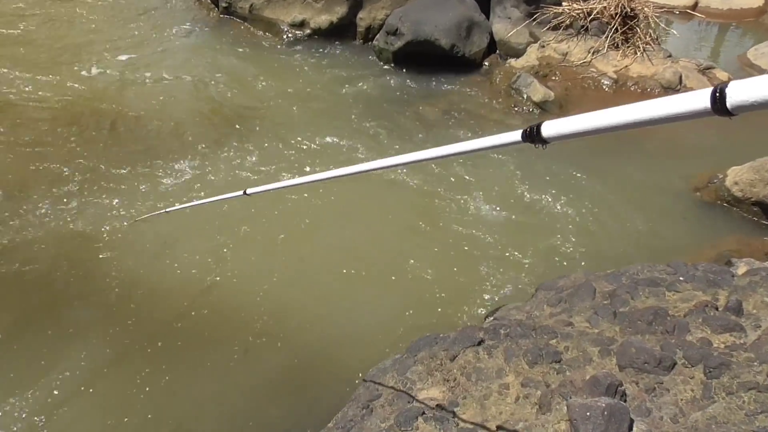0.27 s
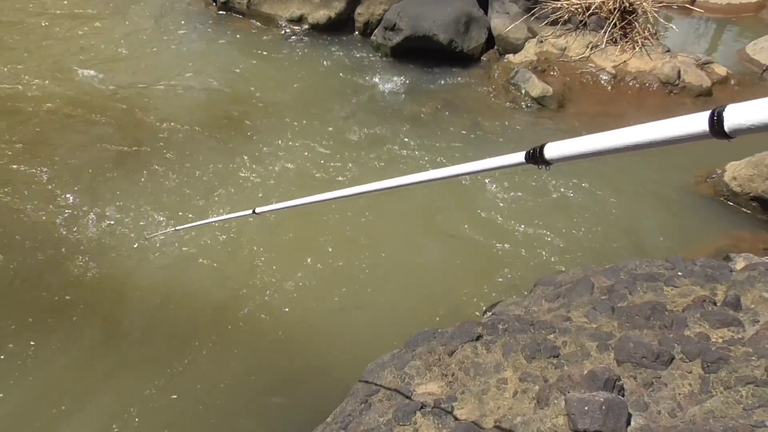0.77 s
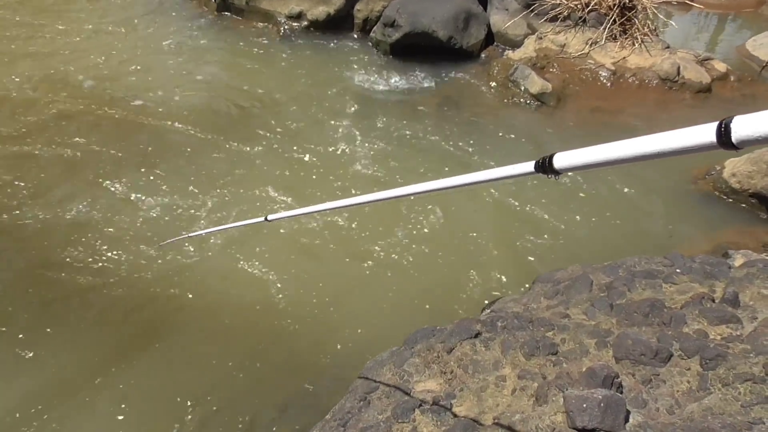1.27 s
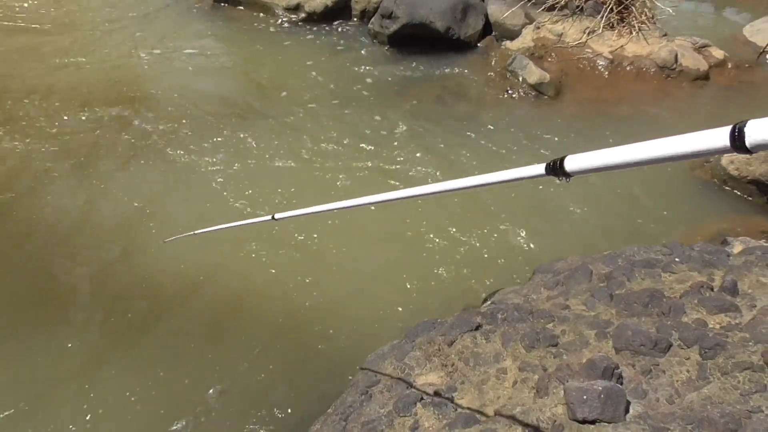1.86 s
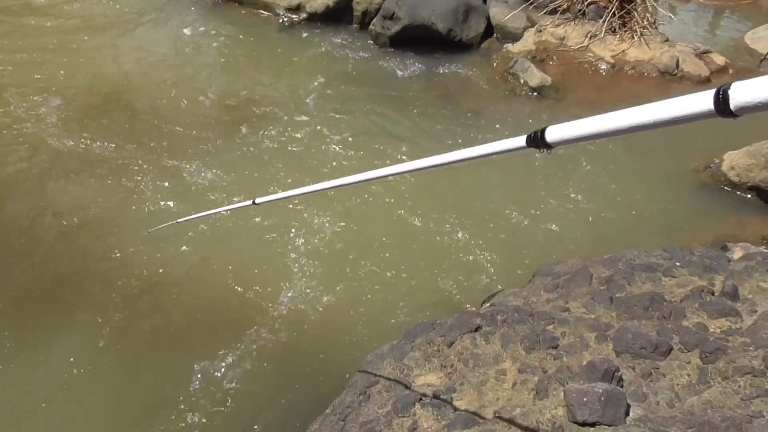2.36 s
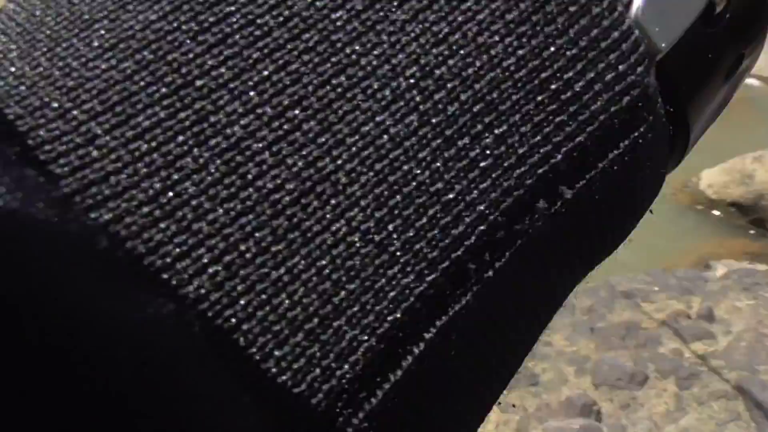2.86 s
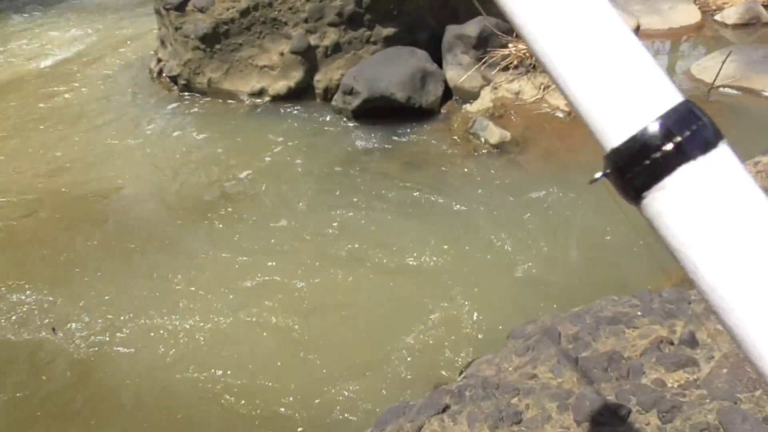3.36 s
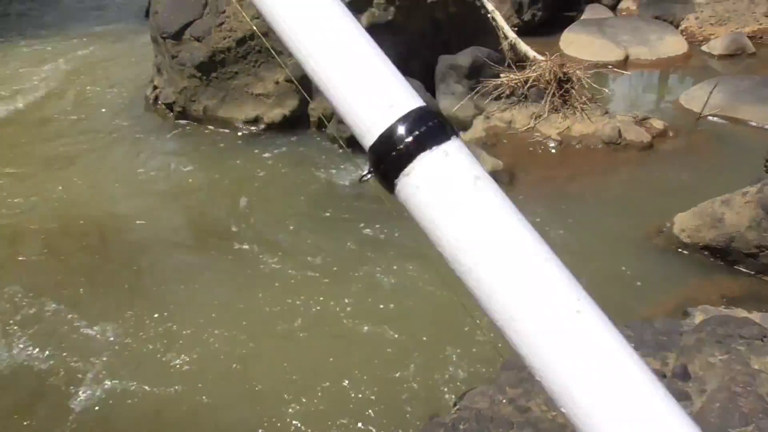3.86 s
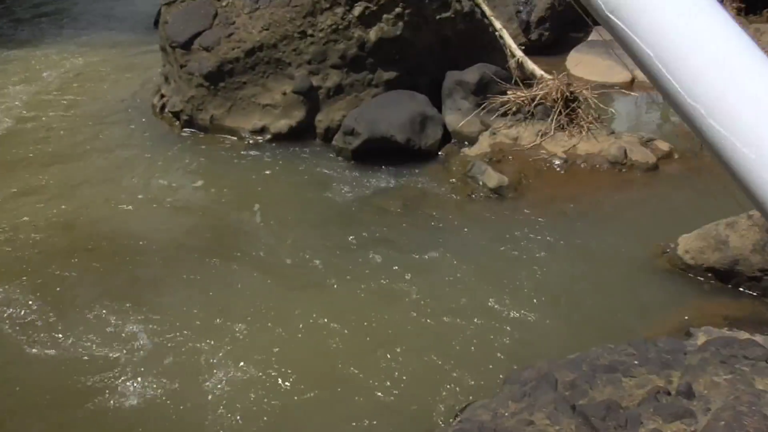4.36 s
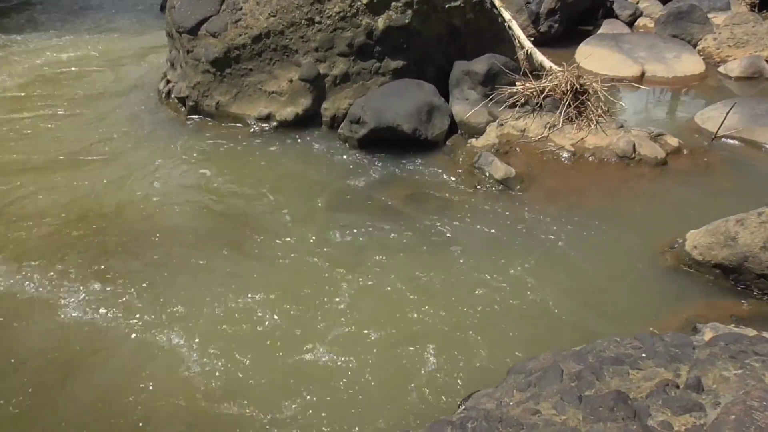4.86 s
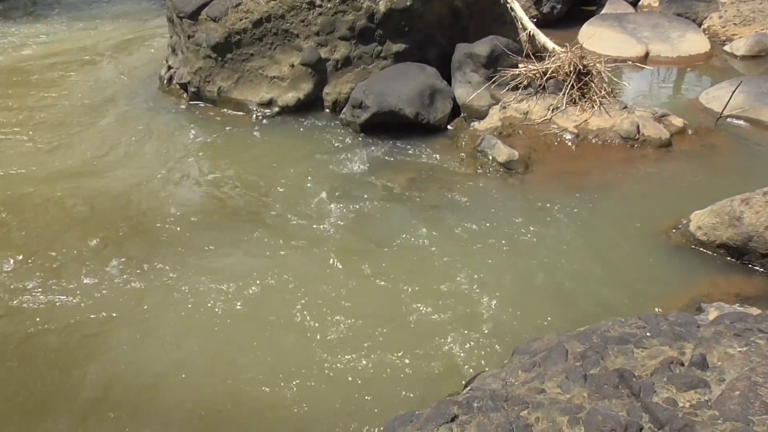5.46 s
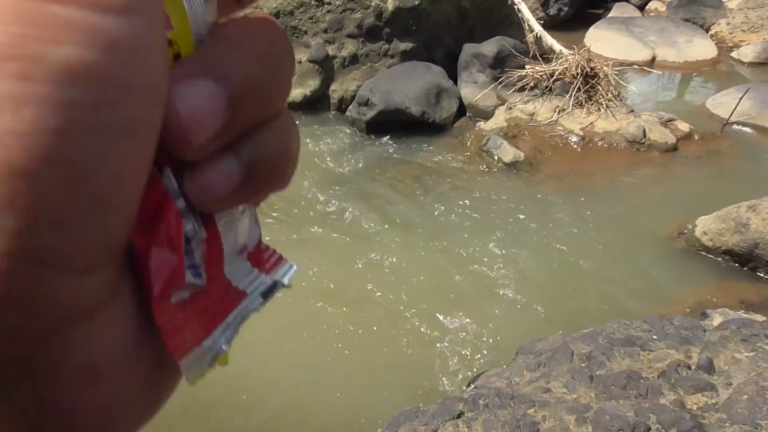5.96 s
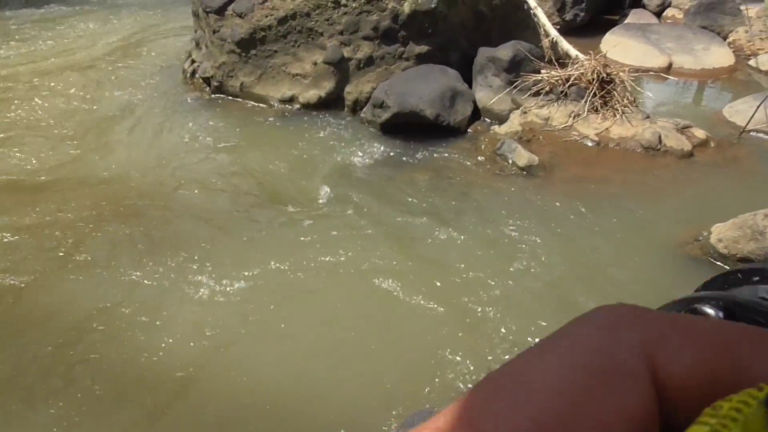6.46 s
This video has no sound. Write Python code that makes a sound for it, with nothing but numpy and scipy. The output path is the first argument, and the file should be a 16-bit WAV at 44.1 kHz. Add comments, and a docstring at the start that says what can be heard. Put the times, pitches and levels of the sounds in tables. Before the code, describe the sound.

A fast shallow river rushes close by outdoors, a steady low-mid roar full of gulps and gurgles with lighter foam fizzing above. Two soft low wind puffs brush the microphones. Suddenly the body vanishes and a flat, bright hiss takes over for just over a second, then the river returns abruptly, with small plips and spatters of spray as the splashing swells and slightly ebbs.

```python
"""Shallow river over rocks

Trapped air roars, gulps and gurgles, while white water fizzes and spits as the splashing swells and ebbs.
Continuous layers are filtered noise with random patches; bubbles are decaying tones of rising pitch.
Two puffs of wind, low-pitched noise independent in each channel, brush the microphones.
For just over a second the river cuts out and a bright, even hiss like fine spray, also noise, replaces it."""
import sys
import numpy as np
from scipy import signal
from scipy.fft import rfft, irfft
from scipy.io import wavfile
from scipy.ndimage import uniform_filter1d

SR = 44100
rng = np.random.default_rng(int(sys.argv[2]) if len(sys.argv) > 2 else 0)


def int16_out(signal):
    """Quantize to a 16-bit WAV file."""
    q = np.round(np.clip(np.atleast_2d(signal).T, -1, 1) * 32767)
    wavfile.write(sys.argv[1], SR, q.astype(np.int16))


N = 296352
TIME = np.arange(N) / SR  # (s)

# Strength of the splashing, which builds, slackens, then swells to a crest and ebbs.
# Each row: time in seconds, splash strength in dB.
SPLASH_STRENGTH = [(0, -31.5), (1.1, -30.5), (1.7, -29.5), (3.0, -35), (3.55, -34), (4.1, -30.5),
                   (5.3, -28), (6.7, -32)]
# Stereo image of the river: how alike the two microphones hear it.
# Each row: frequency in Hz, likeness (correlation, -1 to 1), left minus right in dB, left's lead in radians.
RIVER_STEREO = [(30, .9, 0, 0), (70, .96, -.6, 0), (150, .99, -1, .03), (330, .965, -1.6, .2),
                (650, .84, 1, .4), (1150, .8, 3.2, .44), (2200, .6, 3, .3), (4400, .48, 1, .35),
                (6800, .28, 0, .95), (9500, .38, -.5, 2.8), (12000, .17, -1, 4.3), (15000, .1, -1.5, 5.6)]


def gain_of(db):
    """Level law: converts decibels to an amplitude ratio."""
    return 10 ** (np.asarray(db) / 20)


def evened(x):
    """Power normalisation: scales a signal or field to rms 1."""
    return x / np.sqrt(np.mean(x ** 2) + 1e-20)


def read(points, hz, axis=1):
    """Logarithmic frequency scale: interpolates one column of a table along it."""
    table = np.asarray(points, float)
    return np.interp(np.log(hz + 1), np.log(table[:, 0] + 1), table[:, axis])


def follow(rows):
    """Slow envelope: straight lines between rows of (seconds, value), at every sample."""
    return np.interp(TIME, *np.transpose(rows))


def add(mix, s, sound):
    """Superposition: adds a sound equally to both channels from time s."""
    part = mix[:, max(round(s * SR), 0):][:, :len(sound)]
    part += sound[:part.shape[1]]


def colour(x, spectrum):
    """Linear filtering: weights the spectrum by a table of (Hz, dB), then sets rms 1."""
    hz = np.fft.rfftfreq(N, 1 / SR)
    return evened(irfft(rfft(x) * gain_of(read(spectrum, hz)), N))


def patches(shape, step_s, step_hz, long_s, wide_hz):
    """Correlated randomness: a field over time and frequency, smooth over long_s and wide_hz."""
    along = np.fft.fftfreq(shape[0], step_s)[:, None]
    across = np.fft.rfftfreq(shape[1], step_hz)
    blur = np.exp(-(along * long_s) ** 2 - (across * wide_hz) ** 2)
    return evened(np.fft.irfft2(np.fft.rfft2(rng.standard_normal(shape)) * blur, shape))


def wash(image, patch_db, long_s, wide_hz, flicker_db, flicker_hz, size):
    """Countless small events sum to Gaussian noise: partly correlated stereo, in patches and flurries."""
    hop, hz = size // 4, np.fft.rfftfreq(size, 1 / SR)
    shape = (N // hop + 5, len(hz))
    a, b, c, d = rng.standard_normal((4,) + shape)
    shared, separate = a + 1j * b, c + 1j * d
    same = np.clip(read(image, hz, axis=1), -1, 1)
    # half of the level and phase difference goes to each side
    lean = gain_of(read(image, hz, axis=2) / 2) * np.exp(.5j * read(image, hz, axis=3))
    left = shared * lean
    right = (same * shared + np.sqrt(1 - same ** 2) * separate) / lean
    field_db = patch_db * patches(shape, hop / SR, hz[1], long_s, wide_hz)
    field_db += flicker_db * patches(shape, hop / SR, hz[1], size / SR, flicker_hz)
    spectra = np.array([left, right]) * gain_of(field_db)
    return signal.istft(spectra.transpose(0, 2, 1), nperseg=size, noverlap=size - hop)[1][:, :N]


def ping(hz, cycles, rise):
    """Damped bubble resonance: falls by 1/e in some cycles, pitch rising near the surface (analytic)."""
    age = np.arange(int(6 * cycles / hz * SR) + 2) * hz / SR / cycles  # in decay times
    onset = 1 - np.exp(-2 * age * cycles)
    phase = 2 * np.pi * cycles * (age + rise * age ** 2 / 2)
    return onset * np.exp(-age + 1j * phase)


def bubbles(low_hz, high_hz, per_s, cycles, rise, spread_db, count):
    """Size sets resonance: bubbles of count sizes, born at random across the stream, few of them loud."""
    out = np.zeros((2, N))
    for hz in np.linspace(low_hz, high_hz, count):
        own = np.random.default_rng(rng.integers(2 ** 31))
        likeness, level_db, lead = (read(RIVER_STEREO, hz, axis=column) for column in (1, 2, 3))
        # the less alike the channels, the wider the phase scatter
        widest = np.sqrt(6 * max(1 - likeness, 0))
        for when, strength, tune, life, place, turn in own.random((int(per_s / count * N / SR), 6)):
            detune = (high_hz - low_hz) / count * (tune - .5)
            ring = ping(hz + detune, cycles * (.5 + life), rise) * np.sqrt(hz / low_hz)
            # exponentially distributed decibels, with random polarity
            ring *= gain_of(spread_db * min(-np.log(1 - strength), 4)) * np.sign(turn - .5)
            scatter = (2 * place - 1) * widest
            lean = gain_of(level_db / 2) * np.exp(.5j * (lead + scatter))
            part = out[:, int(when * N):][:, :len(ring)]
            part += np.outer([lean, 1 / lean], ring[:part.shape[1]]).real
    return out


def brighten(x, above_hz, amount):
    """Harder splashing makes finer bubbles: treble moves by amount dB per dB of splash about its median."""
    splash_db = follow(SPLASH_STRENGTH)
    top = signal.sosfiltfilt(signal.butter(2, above_hz, "highpass", fs=SR, output="sos"), x)
    return x + top * (gain_of(amount * (splash_db - np.median(splash_db))) - 1)


def roar():
    """Resonance of air folded in behind the rocks: steady rumble, gulps of large pockets, smaller gurgles."""
    # Spectrum of churned air. Each row: frequency in Hz, relative level in dB per Hz.
    roar_spectrum = [(20, -44.5), (50, -28.5), (85, -15), (105, -12.5), (180, -0.5), (295, 0.5),
                     (380, -3.0), (460, -8.0), (750, -6), (1000, -9.0), (1400, -16), (1750, -26.5),
                     (2100, -48), (3500, -100)]
    start_db, ebb_db_per_s = -16.0, 0.1366  # the level sinks slowly
    rumble = wash(RIVER_STEREO, patch_db=0.8, long_s=.1, wide_hz=350,
                  flicker_db=1.04, flicker_hz=1516, size=1024)
    gulps = bubbles(170.6, 400, per_s=60, cycles=3.8, rise=0.041, spread_db=2.0, count=8)
    gurgles = bubbles(450, 1594, per_s=200, cycles=8, rise=.04, spread_db=3.0, count=12)
    water = gain_of(-0.7) * colour(rumble, roar_spectrum)
    water += gain_of(-8) * colour(gulps, roar_spectrum)
    water += gain_of(-12) * colour(gurgles, roar_spectrum)
    return brighten(water, above_hz=1150, amount=.3) * gain_of(start_db - ebb_db_per_s * TIME)


def white_water():
    """Small bubbles resonate high: bursting foam fizzes, bubbles tinkle and droplets tick on the surface."""
    # Spectrum of white water. Each row: frequency in Hz, relative level in dB per Hz.
    fizz_spectrum = [(1100, -45.5), (1750, -5), (2100, -0.5), (2800, -7), (3900, -4), (4900, -6),
                     (6000, -9.5), (8200, -5.0), (10400, -8.5), (12600, -13.0), (14200, -19), (15400, -24)]
    foam = wash(RIVER_STEREO, patch_db=0.76, long_s=.11, wide_hz=2200,
                flicker_db=0.75, flicker_hz=8000, size=256)
    tinkle = bubbles(1700, 5500, per_s=320, cycles=17, rise=.02, spread_db=2.5, count=12)
    ticks = bubbles(4000, 13000, per_s=400, cycles=4.5, rise=0.021, spread_db=2.5, count=12)
    water = gain_of(-1.0) * colour(foam, fizz_spectrum)
    water += gain_of(-10.5) * colour(tinkle, fizz_spectrum)
    water += gain_of(-12.5) * colour(ticks, fizz_spectrum)
    return brighten(water, above_hz=11000, amount=.25) * gain_of(follow(SPLASH_STRENGTH))


def spits():
    """Damped ringing of single bubbles and drops: a few plip nearby, and spray patters down in clusters."""
    # Near bubbles and droplets. Each row: start in seconds, level in dB, pitch in Hz.
    near_drops = [(1.318, -22, 4200), (1.654, -24, 3700), (3.721, -19, 4660), (3.772, -22, 2060),
                  (4.561, -17.5, 2140), (4.703, -19, 8300), (5.375, -20, 5150), (5.571, -17, 2430),
                  (5.865, -18, 8100)]
    # Handfuls of spray falling back. Each row: centre in seconds, typical level in dB, middle pitch in Hz.
    handfuls = [(4.09, -27.5, 3920), (5.277, -25, 7900), (5.629, -27, 8000)]
    spread_s, spread_db, spread_pitch = .014, 2.5, 0.145  # drop scatter: s, dB, natural log of pitch
    out = np.zeros((2, N))
    for s, db, hz in near_drops:
        add(out, s, gain_of(db) * ping(hz, cycles=7.3, rise=0.017).real)
    for s, db, hz in handfuls:
        for late, size, tune in rng.standard_normal(size=(12, 3)):
            drop = ping(hz * np.exp(spread_pitch * tune), cycles=7.9, rise=0.019).real
            add(out, s + spread_s * late, gain_of(db + spread_db * size) * drop)
    return out


def bright_hiss():
    """Broadband noise: an even, fine-grained hiss with little bass, near the centre."""
    # Spectrum of the hiss. Each row: frequency in Hz, relative level in dB per Hz.
    hiss_spectrum = [(40, -36), (300, -33.5), (800, -24.5), (1300, -14.5), (1650, -13.5), (2800, -0.5),
                     (4800, 0), (6200, -3.5), (7300, -8.5), (8600, -6.0), (10300, -8), (11500, -5.5),
                     (13600, -6), (15500, -9.5)]
    # Its stereo image. Each row: frequency in Hz, likeness (correlation, -1 to 1),
    # left minus right in dB, left's lead in radians.
    hiss_stereo = [(60, .55, 0, 0), (140, .35, 0, 0), (300, -.4, .5, 0), (600, -.68, .5, 0),
                   (1000, -.05, 0, 0), (1650, .8, 0, 0), (2200, .98, 0, 0), (3600, .997, -.2, 0),
                   (4800, .95, -.3, .05), (7500, .64, 0, .3), (15000, .78, 1, .35)]
    level_db = -22.5
    hiss = wash(hiss_stereo, patch_db=0.73, long_s=0.064, wide_hz=3500,
                flicker_db=0.93, flicker_hz=6500, size=256)
    return gain_of(level_db) * colour(hiss, hiss_spectrum)


def wind():
    """Turbulent pressure: eddies thump each microphone separately, each puff swelling as a bell curve."""
    # Spectrum of the buffeting. Each row: frequency in Hz, relative level in dB per Hz.
    buffet_spectrum = [(10, -45), (40, -21), (90, -2), (125, -2), (180, -24), (600, -71.5)]
    # Puffs of wind. Each row: time of the peak in seconds, level in dB.
    puffs = [(1.12, -31), (1.37, -30)]
    puff_s = 0.073  # time from the peak to 1/e of it
    strength = sum(gain_of(db) * np.exp(-((TIME - s) / puff_s) ** 2) for s, db in puffs)
    return colour(rng.standard_normal((2, N)), buffet_spectrum) * strength


def scene():
    """Superposition of the river's sources, with an abrupt switch to the bright hiss and back."""
    hiss_from, hiss_to = 1.699, 2.977  # (s)
    inside = (TIME > hiss_from) & (TIME < hiss_to)
    switched = uniform_filter1d(inside.astype(float), size=64)  # a 64-sample crossfade avoids clicks
    river = roar() + white_water() + spits() + wind()
    return (1 - switched) * river + switched * bright_hiss()


def record(dry):
    """Band limitation: the recorder passes only what lies below its upper edge."""
    edge_hz = 15600
    lowpass = signal.firwin(511, edge_hz, window=("kaiser", 9), fs=SR)
    return signal.oaconvolve(dry, lowpass[None], "same")


dry = scene()
out = record(dry)
int16_out(out)
```